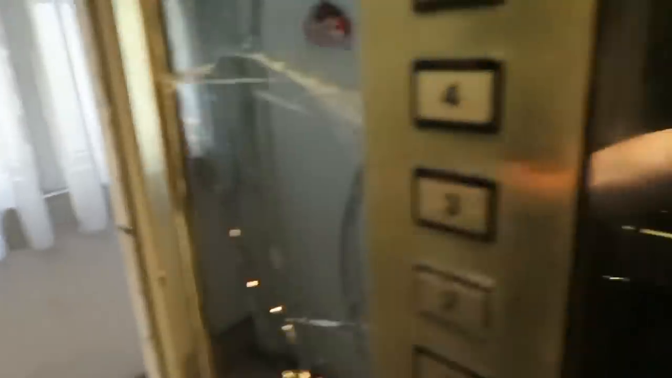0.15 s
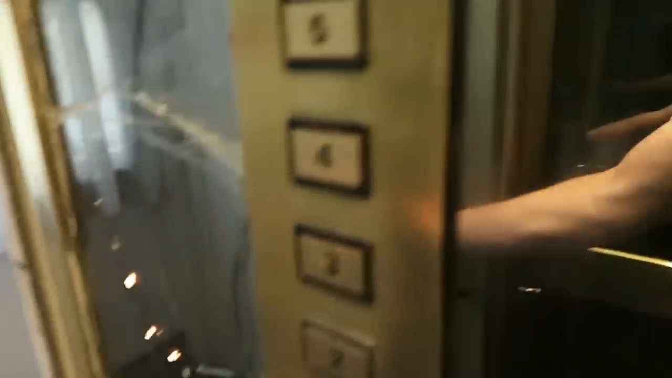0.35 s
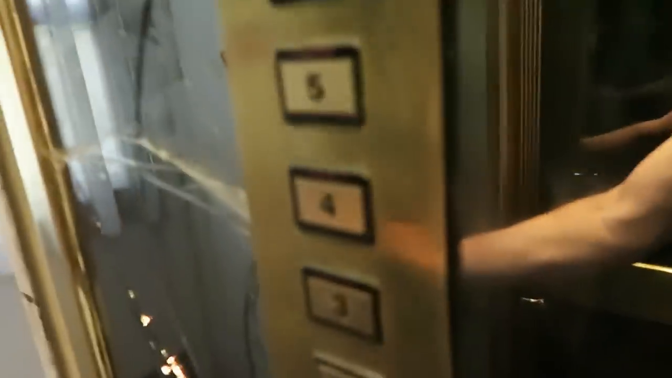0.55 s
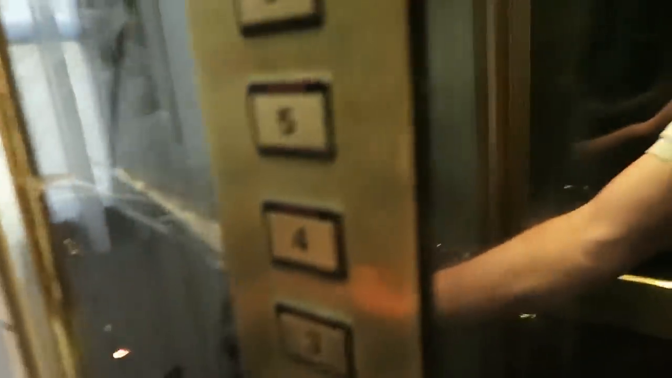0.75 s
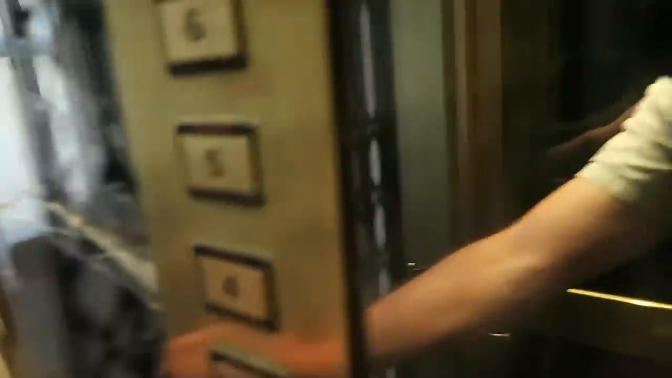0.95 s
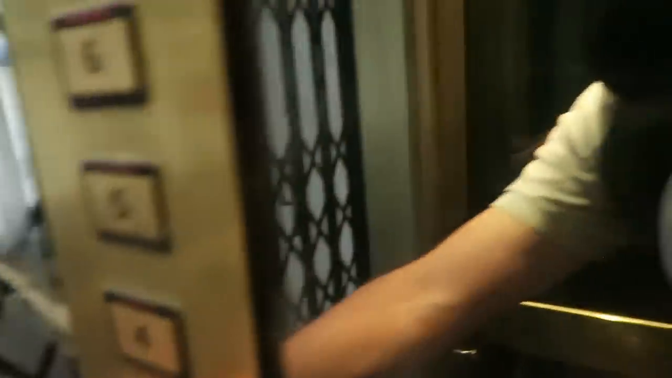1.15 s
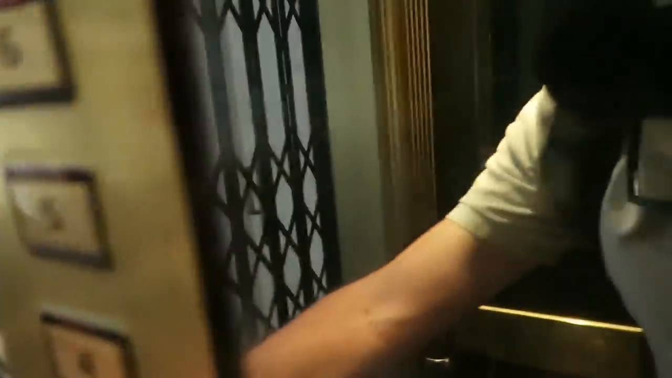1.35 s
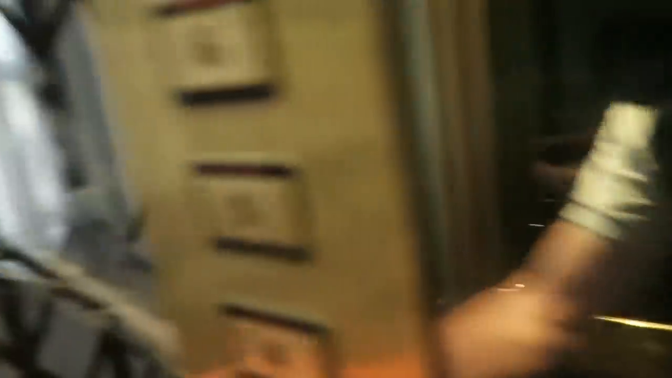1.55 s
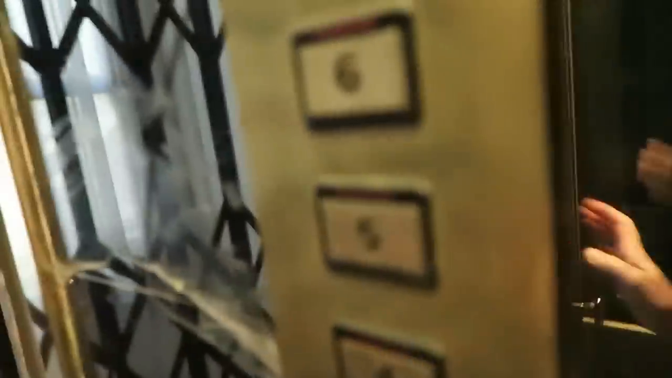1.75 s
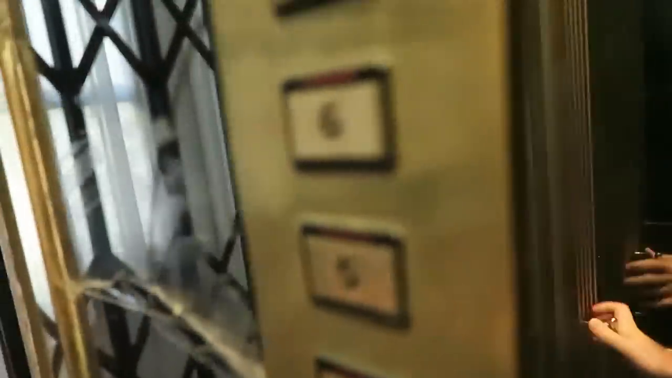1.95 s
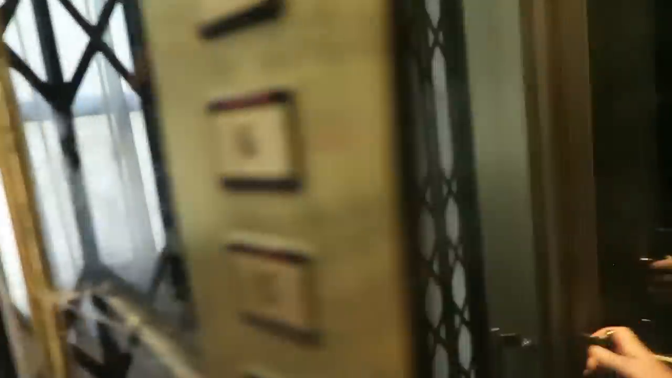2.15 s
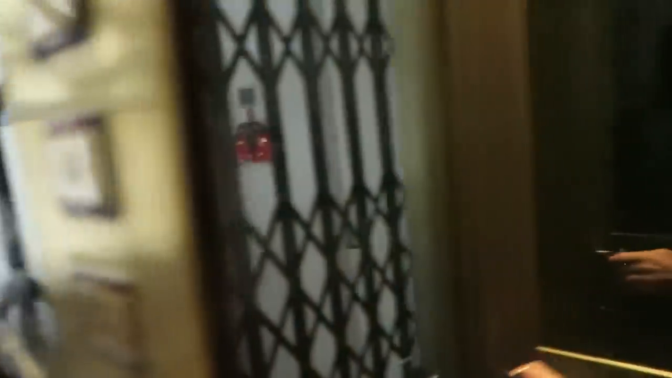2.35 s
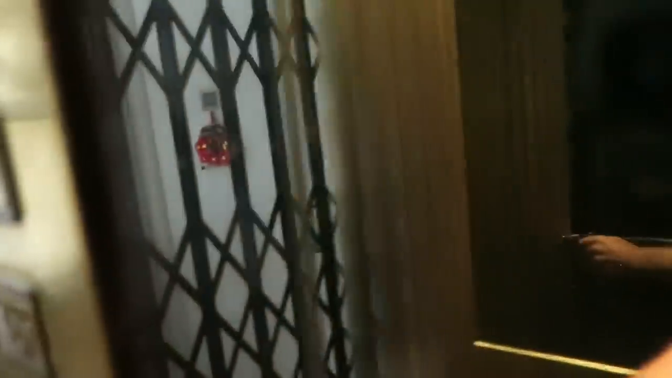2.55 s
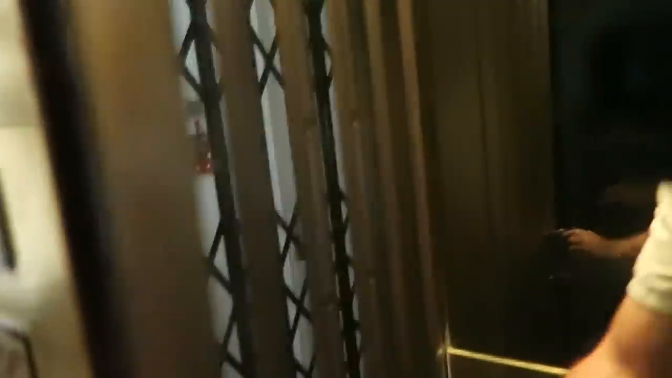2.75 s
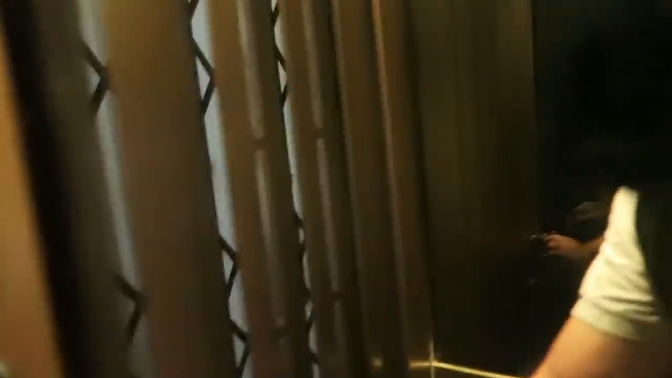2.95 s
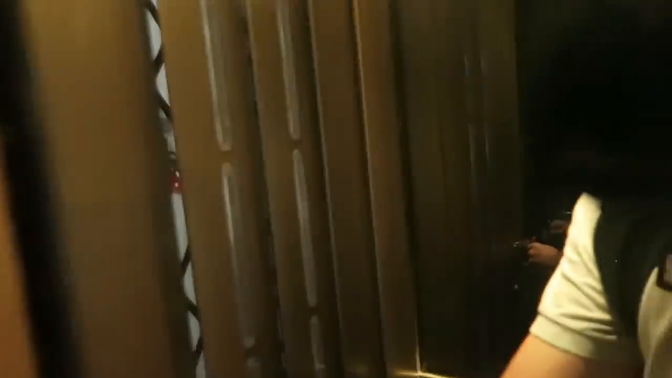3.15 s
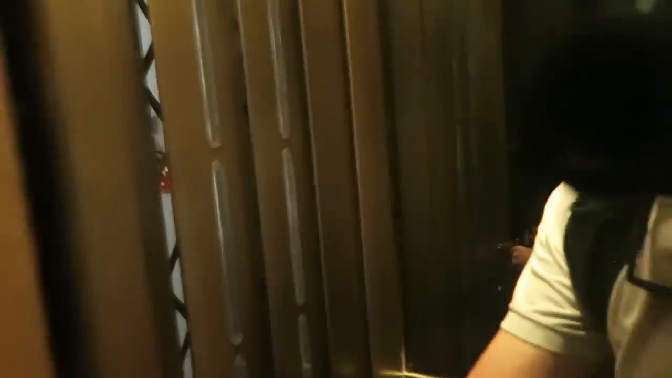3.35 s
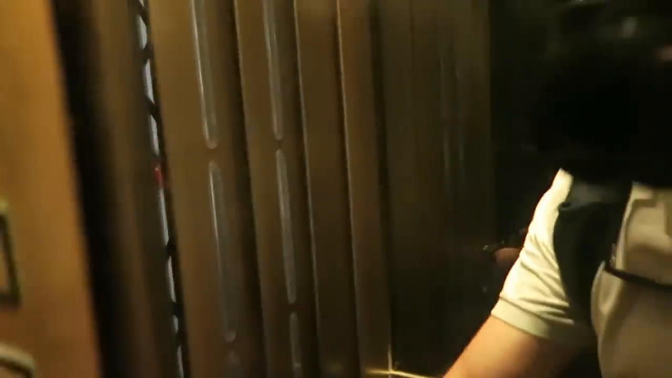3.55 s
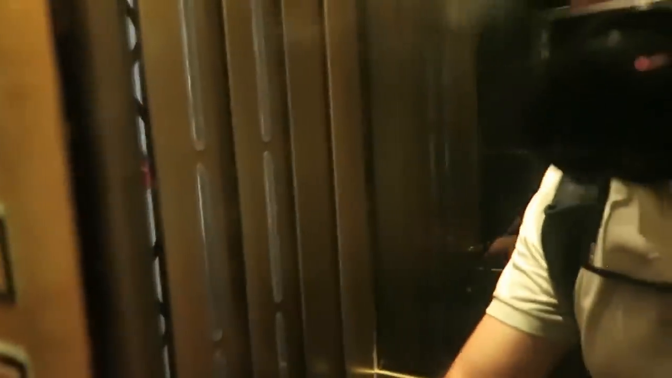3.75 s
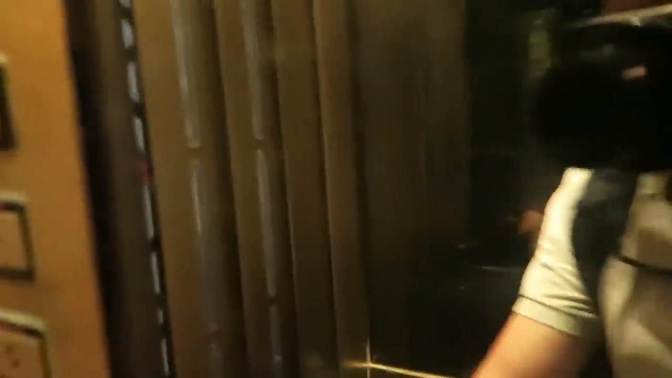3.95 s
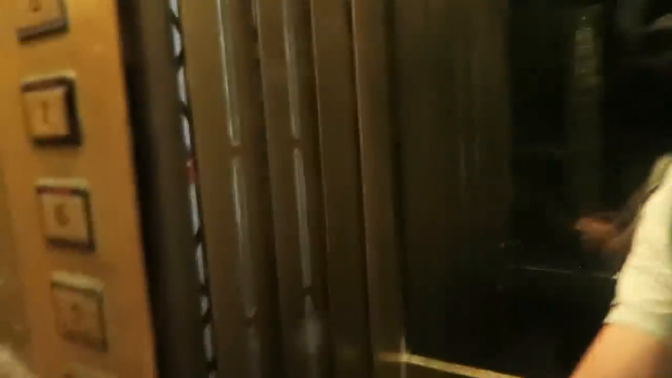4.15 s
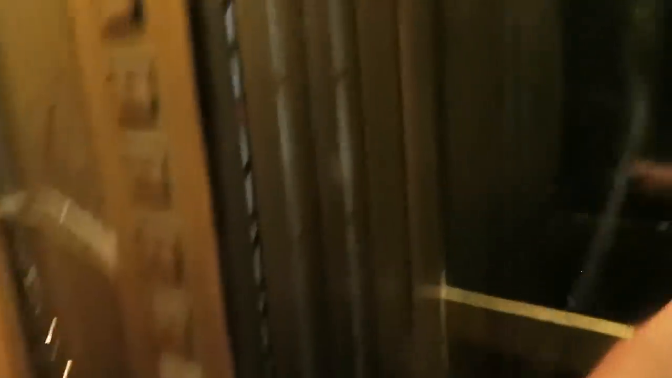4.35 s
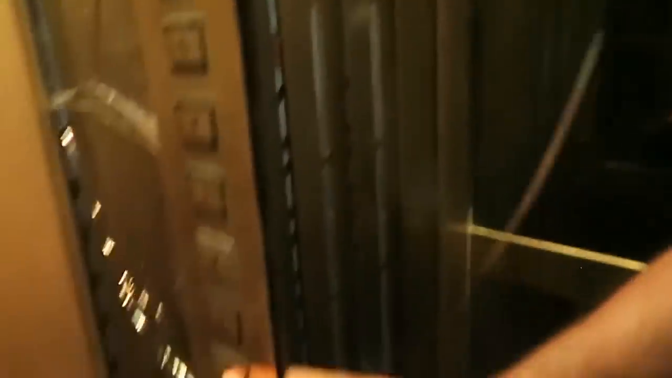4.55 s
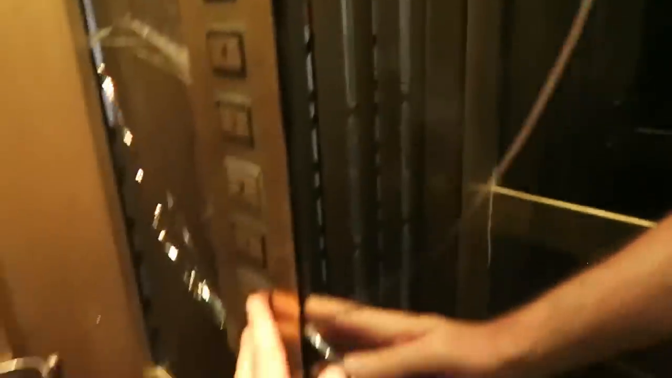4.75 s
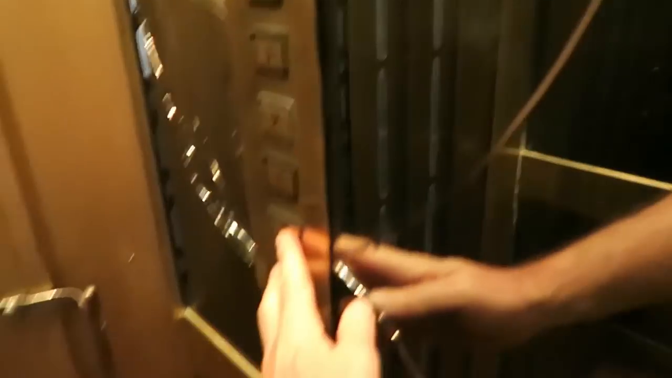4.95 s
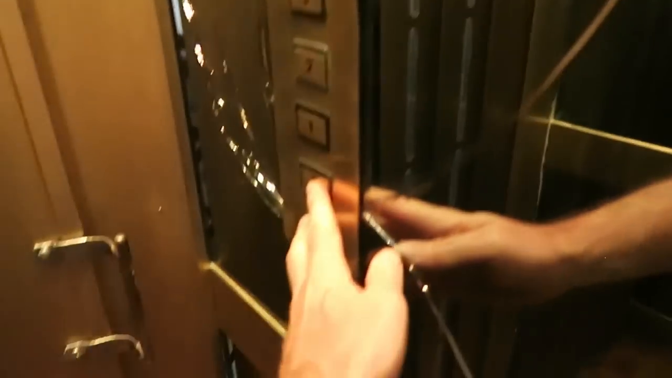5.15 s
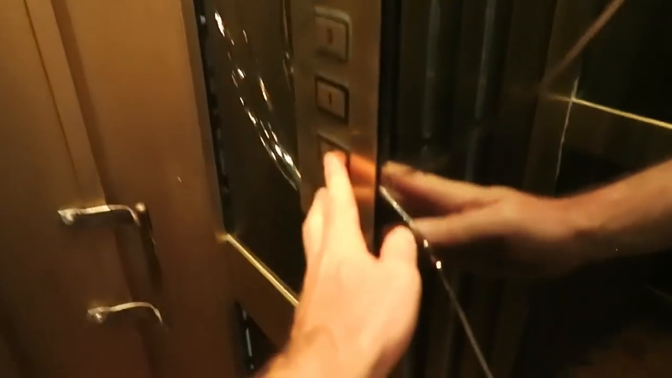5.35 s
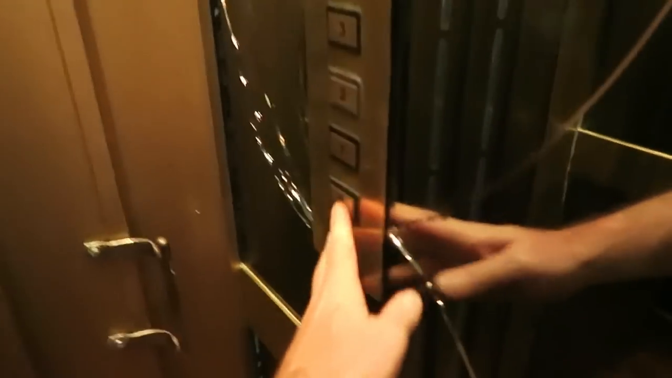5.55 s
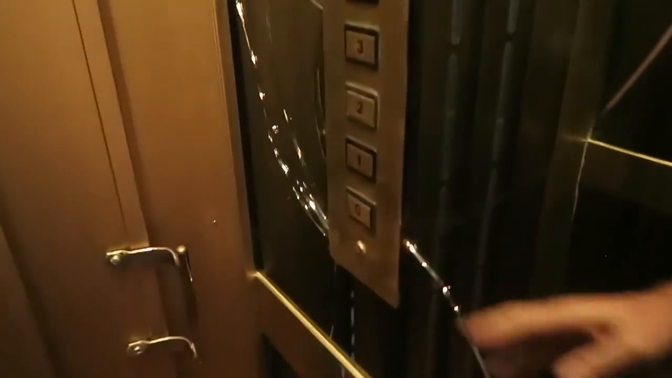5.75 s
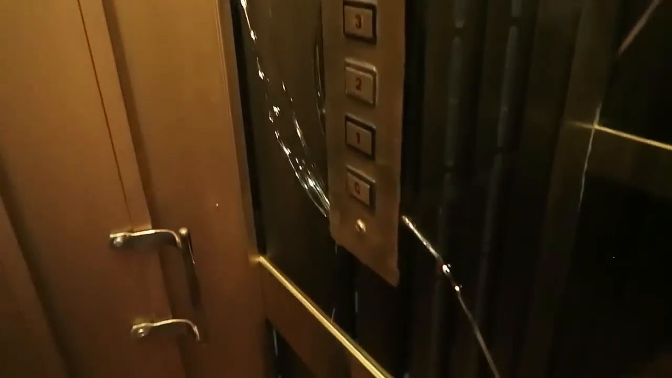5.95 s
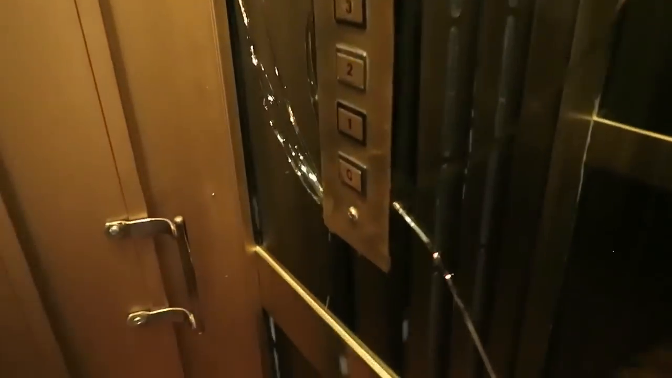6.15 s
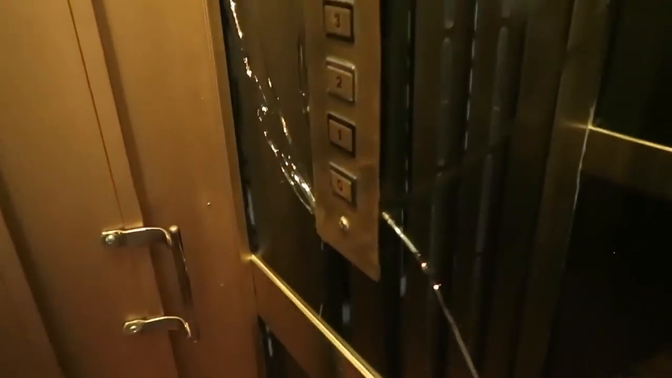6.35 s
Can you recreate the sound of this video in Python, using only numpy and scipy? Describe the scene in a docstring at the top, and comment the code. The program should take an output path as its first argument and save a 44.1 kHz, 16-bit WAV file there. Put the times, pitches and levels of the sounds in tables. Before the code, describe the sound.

An old small lift is closed and started, heard close by a handheld phone in a reverberant stairwell. A hard metallic knock comes at 0.1 s over low rumble, with a smaller click at 0.2. From 0.4 to 1.2 s a lattice gate scrapes along its rail, growing louder, links clinking and a roller squealing around 1.4 kHz; it slams and latches with a tight double clack at 1.18 and 1.27. Faint ticks follow in the decay. From 2.2 to 3.0 folding doors clatter densely, with clear ringing taps near 2.6 and 2.9 and a tiny high squeak at 2.7; final knocks land at 3.26 and 3.5. A low hum swells; sleeve rustles pass at 3.9 and 4.5-4.8. A faint button click at 5.03 and brief scrape lead to a sharp bang at 5.24 with rattling echoes. From 5.9 low rolling rumble and a soft clunk at 6.33 end it.

```python
"""Gate, doors and jolt of an old lift car

A steel lattice gate is drawn shut and latches, folding doors rattle closed, a sleeve brushes past,
a button is pressed and the small car jolts off with a bang. Impacts excite modal resonators, sliding
parts drive them with stick-slip noise, and small links add decaying sines. A hum made of filtered noise
lies beneath; a stairwell adds most of a second of decay. A hand-held phone hears it at two close ports.
"""
import sys
import numpy as np
from scipy import signal
from scipy.fft import rfft, irfft
from scipy.io import wavfile
from scipy.ndimage import uniform_filter1d

SR = 44100
rng = np.random.default_rng(int(sys.argv[2]) if len(sys.argv) > 2 else 0)


def output_pcm(signal):
    """Save a mono or channel-first signal as 16-bit PCM at the path in sys.argv[1].

    Samples are clipped to [-1, 1] before scaling.
    """
    pcm = np.clip(np.atleast_2d(signal).T, -1, 1) * 32767
    wavfile.write(sys.argv[1], SR, np.round(pcm).astype(np.int16))


N = 282240
TIME = np.arange(N) / SR


def undb(db):
    """Level to amplitude: 20 dB is a factor of ten."""
    return 10 ** (np.asarray(db) / 20)


def unit(x):
    """Normalise by the effective value: root mean square becomes one."""
    return x / np.sqrt(np.mean(x ** 2))


def shape(x, hz, db):
    """Zero-phase linear filtering: gains in dB joined on a log-frequency axis."""
    f = np.maximum(np.arange(len(x) // 2 + 1) * SR / len(x), 1)
    gain = undb(np.interp(np.log(f), np.log(hz), db))
    return irfft(rfft(x) * gain, len(x))


def band(x, lo_hz, hi_hz):
    """Band-pass filtering, then normalised to unit power."""
    sos = signal.butter(2, [lo_hz, hi_hz], "bandpass", fs=SR, output="sos")
    return unit(signal.sosfilt(sos, x))


def curve(rows, column=1):
    """Level envelope: a dB column joined over time, -120 dB outside its span."""
    rows = np.array(rows)
    return np.interp(TIME, rows[:, 0], rows[:, column], left=-120, right=-120)


def grit(size, grain_ms, spread_db):
    """Granular contact noise: many small contacts of uneven strength."""
    k = max(int(grain_ms * SR / 1000), 2)
    sizes = undb(spread_db * rng.exponential(size=size // k + 1))
    strength = uniform_filter1d(np.repeat(sizes, k)[:size], k)
    return unit(strength * rng.standard_normal(size))


def walk(rate, size=N):
    """Slow random modulation: levels held 1 / rate s and slewed, spread near one."""
    k = int(SR / rate)
    held = np.repeat(rng.standard_normal(size // k + 1), k)
    return 0.917 * uniform_filter1d(uniform_filter1d(held, k), k)[:size]


def ring(x, modes, lift_db, direct=1, detune=1):
    """Modal superposition: direct sound plus resonances, with a lift and detuning for all or each."""
    hz = np.maximum(np.arange(len(x) // 2 + 1) * SR / len(x), 1)
    lift_db, detune = np.broadcast_to(lift_db, len(modes)), np.broadcast_to(detune, len(modes))
    response = direct
    for (f, width, db), lift, d in zip(modes, lift_db, detune):
        width = max(width, 4)  # Hz
        response = response + undb(db + lift) / (1 + 1j * (hz ** 2 - (f * d) ** 2) / (hz * width))
    return irfft(rfft(x) * response, len(x))


def diffuse(x, size):
    """Diffuse field: magnitudes kept, phases unrelated, as if arriving by other paths."""
    frames = signal.stft(x, nperseg=size)[2]
    turns = np.exp(2j * np.pi * rng.random(frames.shape))
    return np.sqrt(2) * signal.istft(frames * turns, nperseg=size)[1][:N]


SHAFT_FROM_S = 5.1  # from here the metal sounds into the shaft

# Spectrum of the building's drone: [f/Hz, level/dB per Hz]
DRONE_TONE = [(53, -29), (90, -7), (130, -9), (186, -2), (236, -5.5), (300, -3), (458, -7), (799, -6.5),
              (1100, 7), (3730, -5), (6100, -18), (12100, -26), (13800, -46), (15000, -58)]
# Resonances of the hum: [f/Hz, width/Hz (at least 4 is used), level/dB before a common lift]
HUM_RING = [(53, 3.4, 5.1), (95, 3.7, 10.8), (191.2, 1.77, 4.9), (249.6, 3, 1.6), (295.8, 4.6, 4.7),
            (389, 6.5, 3.1), (499, 4.44, 2)]
# Deep rumble of the swaying car: [t/s, level/dB]
SHAKE = [(0.0, -35), (0.19, -33), (0.5, -40), (0.8, -40), (1.0, -39), (1.51, -46), (1.57, -82), (2.23, -60),
         (2.3, -52), (3.0, -51), (3.7, -54), (5.5, -56.5), (5.9, -44.5), (5.99, -41), (6.08, -34),
         (6.22, -43), (6.33, -34.5), (6.4, -43)]
DRONE_DB, HUM_SWELL_DB, HISS_FLICKER_DB, SWAY_DB = -50, 2.5, 1.8, 2.5
SHUT_DB, SHUT_S = 6, 2.77  # the hum grows over one second from here, closer once the doors are shut
BOOM_S, BOOM_DB, THUMP_DB = 0.051, -15, -40
SHAFT_BOOM_DB = -4.5  # the shut car booms less
BASS_DIP_S, BASS_DIP_DB = (0.93, 3.1), -6  # the deepest hum dips


def background(metal):
    """Forced vibration: rumble and drone, with panels booming along with the power that shakes them."""
    keep = np.exp(-1 / (BOOM_S * SR))
    shaking = np.sqrt(signal.lfilter([1 - keep], [1, -keep], metal ** 2))
    drone = ring(shape(rng.standard_normal(N), *np.transpose(DRONE_TONE)), HUM_RING, lift_db=2.0)
    hum = undb(DRONE_DB + SHUT_DB * np.clip(TIME - SHUT_S, 0, 1) + HUM_SWELL_DB * walk(3.796))
    boom = undb(BOOM_DB + SHAFT_BOOM_DB * (TIME > SHAFT_FROM_S)) * shaking
    low = unit(shape(drone, (700, 1500), (0, -30))) * (hum + boom)
    in_dip = (TIME > BASS_DIP_S[0]) & (TIME < BASS_DIP_S[1])
    low = np.where(in_dip, shape(low, (170, 240), (BASS_DIP_DB, 0)), low)
    high = unit(shape(drone, (700, 1500), (-30, 0))) * undb(-56.0 + HISS_FLICKER_DB * walk(3.7))
    rumble = ring(band(rng.standard_normal(N), 28, 110), [(56.3, 7.6, 5.3), (93.6, 3.4, 1.9)], lift_db=1.5)
    sway = undb(curve(SHAKE) + SWAY_DB * walk(10.0))
    return low + high + rumble * (sway + undb(THUMP_DB) * shaking)


# Decay of the stairwell, stretched by each caller: [f/Hz, t60/s]
STAIR_T60 = [(150, 1), (600, 1), (2000, 0.94), (4300, 0.74), (5300, 0.67), (7000, 0.57), (12000, 0.32)]


def stairwell(x, longer):
    """Statistical reverberation: dense echoes build over some ms and die exponentially band by band."""
    t = np.arange(int(1.5 * SR)) / SR
    noise = rfft(rng.standard_normal(len(t)))
    place = np.log(np.maximum(np.arange(len(noise)) * SR / len(t), 1))
    centres = np.log([hz for hz, _ in STAIR_T60])
    tail = np.zeros(len(t))
    # overlapping bands that add up to one, each with its own decay
    for share, (_, t60) in zip(np.eye(len(centres)), STAIR_T60):
        part = irfft(noise * np.interp(place, centres, share), len(t))
        tail += part * np.exp(-np.log(1000) * t / (t60 * longer))
    tail *= 1 - np.exp(-t / 0.0078)
    return signal.fftconvolve(x, tail / np.sqrt(np.sum(tail ** 2)))[:N]


# Colour of the shaft: [f/Hz, level/dB]
SHAFT_TONE = [(300, -0.5), (700, 0.5), (1200, -2), (2500, -4), (4000, -0.5), (7000, -2)]
# Panels that colour the shaft: [f/Hz, width/Hz, level/dB before a common lift]
SHAFT_RING = [(294, 20, 2), (1080, 60, 1), (1762, 50, 2), (2250, 70, 0), (2950, 70, 0), (3736, 70, 2),
              (4350, 70, 2)]
STAIR_DB, SHAFT_DB = -14.5, 1  # the shaft is wetter by SHAFT_DB
SHAFT_LONGER = 1.19  # share of the tabled t60
PING_ROOM_DB = -9  # the taps are close by and stir the stairwell less


def reverberation(metal, taps):
    """Coupled spaces: early metal and taps excite the stairwell, later metal the panelled shaft."""
    late = TIME > SHAFT_FROM_S
    stairs = (metal * ~late + undb(PING_ROOM_DB) * taps) * undb(STAIR_DB)
    shaft = ring(shape(metal * late, *np.transpose(SHAFT_TONE)), SHAFT_RING, lift_db=-2.5)
    return stairwell(stairs, longer=0.95) + stairwell(shaft * undb(STAIR_DB + SHAFT_DB), SHAFT_LONGER)


# Strokes of the sleeve: [t/s, swell/s, hold/s, fade/s, level/dB]
CLOTH = [(3.785, 0.16, 0.0069, 0.039, -41.5), (4.42, 0.081, .0, 0.034, -49.5),
         (4.548, 0.11, 0.11, 0.059, -40)]
# Spectrum of the fabric: [f/Hz, level/dB per Hz]
CLOTH_TONE = [(530, -27), (900, -3.5), (1170, -5.5), (2110, -1), (4920, -11), (8540, -13.5), (14000, -22)]
CLOTH_EDGE_DB = -13  # start of the swell and end of the fade
CLOTH_TRAIL_S, CLOTH_TRAIL_DB = 0.12, -16  # the hiss trails off after the stroke


def cloth():
    """Broadband friction noise: smooth hiss of fabric that swells, holds, fades and trails off."""
    hiss = unit(shape(grit(N, grain_ms=0.44, spread_db=1.0), *np.transpose(CLOTH_TONE)))
    steps_db = np.array([CLOTH_EDGE_DB, 0, 0, CLOTH_EDGE_DB, CLOTH_EDGE_DB + CLOTH_TRAIL_DB])
    strength = np.zeros(N)
    for s, swell, hold, fade, db in CLOTH:
        times = np.cumsum([s, swell, hold, fade, CLOTH_TRAIL_S])
        strength += undb(curve(list(zip(times, db + steps_db))))
    return strength * hiss


DRIFT = .012  # share of pitch by which modes wander in a slide
CATCH_DB = 5


def wander(x):
    """Frequency modulation by variable reading speed: a resonance slides as the part moves."""
    place = np.arange(len(x))
    return np.interp(place + np.cumsum(DRIFT * walk(14, size=len(x))), place, x)


def slide(rows, modes, roll_db, hiss_db, patchy_db, ring_db, clacks_per_s, scrape_db=0.0):
    """Stick-slip friction: rollers and links drag in uneven slips; each mode speaks as its part catches."""
    scrape = band(grit(N, grain_ms=4.0, spread_db=1.0), 590, 2145)
    roll = band(rng.standard_normal(N), 177, 590)
    hiss = band(grit(N, grain_ms=0.72, spread_db=2.5), 1400, 7900)
    clacks = (rng.random(N) < clacks_per_s / SR) * undb(1.26 * rng.exponential(size=N))
    jolt = 1 + 0.5 * signal.lfilter([1], [1, -np.exp(-1 / (0.0029 * SR))], clacks)
    mix = jolt * (undb(scrape_db) * scrape + undb(hiss_db) * hiss) + undb(roll_db) * roll
    mix *= undb(curve(rows) + patchy_db * walk(39.8))
    start = int(rows[0][0] * SR)
    span = slice(start, start + 3 * SR // 2)
    drag = mix[span]
    rings = np.zeros(N)
    for mode in modes:
        catching = drag * undb(CATCH_DB * walk(22.32, size=len(drag)))
        rings[span] += wander(ring(catching, [mode], ring_db, direct=0))
    return mix + rings


def squeak(hz, db, waver, stutter_db, per_s):
    """Friction-driven oscillation: a thin tone that wavers and stutters as the part slips."""
    level = undb(db + stutter_db * walk(per_s))
    phase = 2 * np.pi * np.cumsum(hz * (1 + waver * walk(300))) / SR
    return np.sqrt(2) * level * np.sin(phase)


CLINK_LO_HZ, CLINK_HI_HZ, CLINK_TILT_DB = 881, 7380, -3.5  # tilt per octave
CLINK_T60_S = 0.066  # each clink takes a chance share from 0.38 to 2.28 of it
CLINKS_PER_S, CLINK_SPREAD_DB = 340, 24


def clinks(rows, db):
    """Random impact process: loose links and pins tick, each with its own short decaying note."""
    span = rows[-1][0] - rows[0][0]
    chances = rng.random((int(CLINKS_PER_S * span), 4))
    when, pitch, size, length = chances.T[:, :, None]
    start = ((rows[0][0] + when * span) * SR).astype(int)
    octaves = pitch * np.log2(CLINK_HI_HZ / CLINK_LO_HZ)
    k = np.arange(SR // 10)
    gain = undb(curve(rows)[start] + db - CLINK_SPREAD_DB * size + CLINK_TILT_DB * octaves)
    tone = np.sin(2 * np.pi * CLINK_LO_HZ * 2 ** octaves * k / SR)
    decay = np.exp(-np.log(1000) * k / SR / (CLINK_T60_S * (0.38 + 1.9 * length)))
    return np.bincount((start + k).ravel(), (gain * tone * decay).ravel(), N + SR)[:N]


# Force of the gate's drag along the rail: [t/s, level/dB]
GATE_SLIDE = [(0.0, -41.5), (0.084, -48), (0.178, -40.5), (0.322, -41.5), (0.422, -43.5), (0.466, -37),
              (0.644, -34), (0.896, -30), (1.17, -30.5)]
# Low hum notes: [f/Hz, level/dB]
HUM_NOTES = [(55, -4), (97, -14), (146, 1), (194, 0), (291, -4), (388, -4)]
HUM_NOTES_DB, HUM_REST_DB, HUM_STOPS_S, HUM_WAVER = -12.5, -52, 1.53, .004


def hum_notes():
    """Low hum notes: wavering tones swell while the gate is dragged and stop once it has settled."""
    notes = np.zeros(N)
    for hz, db in HUM_NOTES:
        level = undb(db + 1.2 * walk(4.0))
        notes += level * np.sin(2 * np.pi * np.cumsum(hz * (1 + HUM_WAVER * walk(8.5))) / SR)
    drag = uniform_filter1d(undb(curve(GATE_SLIDE)), int(.21 * SR))
    return np.sqrt(2) * notes * (drag * undb(HUM_NOTES_DB) + undb(HUM_REST_DB)) * (TIME < HUM_STOPS_S)


# Modes of the lattice gate: [f/Hz, width/Hz, level/dB before lift]
GATE_RING = [(144.6, 4.9, 13), (410, 7.3, -4), (687, 18, -0.5), (882, 13.7, 1), (1390, 21, -3.5),
             (1520, 11, -7), (2320, 26, 0.5), (2780, 49, -2.5), (3230, 37, -0.5), (4290, 56, 1),
             (5790, 57, 2.5), (6970, 1200, 0)]
# The roller sings on two notes by turns: [t/s, lower note level/dB, upper note level/dB]
ROLLER = [(0.44, -38.5, -46), (0.552, -38, -44), (0.564, -34, -44.5), (0.72, -33, -37.5),
          (0.74, -37.5, -44), (0.764, -37.5, -29), (0.798, -42, -40), (0.82, -41.5, -38),
          (0.888, -34.5, -33.5), (0.956, -32.5, -43), (1.032, -40.5, -39.5), (1.046, -34.5, -36.5),
          (1.094, -45, -49), (1.15, -38.5, -40.5)]
ROLLER_HZ = (1413, 1520)
ROLLER_WAVER, ROLLER_DRIFT, ROLLER_STUTTER_DB = .035, .018, 4.5


def gate():
    """Friction-excited modes: the lattice drags and clinks along its rail while a roller sings."""
    sound = slide(GATE_SLIDE, GATE_RING, roll_db=-4.0, hiss_db=-15, patchy_db=1.5, ring_db=9.0,
                  clacks_per_s=13)
    for k, hz in enumerate(ROLLER_HZ):
        pitch = hz * (1 + ROLLER_DRIFT * walk(13))
        sound += squeak(pitch, curve(ROLLER, column=k + 1), waver=ROLLER_WAVER,
                        stutter_db=ROLLER_STUTTER_DB, per_s=49)
    return sound + clinks(GATE_SLIDE, db=6.5)


# Taps on a door bar: [t/s, level/dB, ring length as a share of the mode's t60]
PINGS = [(2.385, -24, 0.8), (2.572, -11.5, 1), (2.593, -6.5, 0.9), (2.611, -13, 0.8), (2.8817, -0.5, 0.57),
         (2.914, -4, 0.9), (2.928, -5, 1), (2.967, -4.5, 0.46), (2.987, -15, 0.73), (3.011, -16, 0.6),
         (3.031, -23, 0.5)]
# Close modes of the bar, varied at each tap: [f/Hz, level/dB, t60/s]
BAR_MODES = [(1640, -6, 0.012), (1824, 3.5, 0.028), (1930, -5.5, 0.096), (2145, -6, 0.023)]


def pings():
    """Beating of neighbouring modes: clean taps set the close modes of one bar ringing together."""
    out, t = np.zeros(N), np.arange(SR // 4) / SR
    chances = rng.standard_normal((len(PINGS), len(BAR_MODES)))
    for (s, db, length), chance in zip(PINGS, chances):
        tone = np.zeros(len(t))
        for (hz, g, t60), c in zip(BAR_MODES, chance):
            decay = np.exp(-np.log(1000) * t / (t60 * length))
            tone += undb(g + 1.9 * c) * np.sin(2 * np.pi * hz * (1 + 0.0062 * c) * t) * decay
        i = int(s * SR)
        out[i:i + len(t)] += undb(db) * (1 - np.exp(-t / 0.001)) * tone
    return out


# Force of the folding doors' slide: [t/s, level/dB]
DOOR_SLIDE = [(2.17, -51), (2.246, -41.5), (2.32, -36.5), (2.478, -24.5), (2.538, -26), (2.636, -19.5),
              (2.7, -25.5), (2.86, -27.5), (3.002, -36.5), (3.15, -40)]
# Modes of the doors: [f/Hz, width/Hz, level/dB before lift]
DOOR_RING = [(228.3, 13.5, 6), (438.5, 68, -2.5), (1038, 13, -9), (1910, 144, -11.5), (2410, 69, -10.5),
             (3380, 15, -11.5), (4070, 24, -1), (4950, 43, -2)]
# A dry hinge: [t/s, f/Hz, level/dB]
SQUEAK = [(2.69, 10200, -75), (2.718, 10260, -34.5), (2.738, 10140, -47), (2.744, 10320, -39),
          (2.82, 10100, -56)]


def doors():
    """Friction-excited modes: folding doors drag and clink while a dry hinge squeaks."""
    sound = slide(DOOR_SLIDE, DOOR_RING, roll_db=-18.5, hiss_db=-29, patchy_db=2.0, ring_db=5.0,
                  clacks_per_s=49)
    hinge_hz = np.interp(TIME, *np.transpose(SQUEAK)[:2])
    sound += squeak(hinge_hz, curve(SQUEAK, column=2), waver=0.0054, stutter_db=4.5, per_s=140)
    return sound + clinks(DOOR_SLIDE, db=3.5)


# A scrape that grows into the bang: [t/s, level/dB]
PRESS_RUB = [(5.08, -66), (5.12, -64), (5.178, -51), (5.192, -39), (5.212, -31), (5.222, -27), (5.24, -27)]
# Resonances of the scrape: [f/Hz, width/Hz, level/dB before lift]
RUB_RING = [(710, 120, 0), (1680, 58, 8), (2190, 60, -8)]
# A faint thin ring: [t/s, level/dB]
WHINE = [(4.8, -80), (4.86, -72), (5.0, -72), (5.04, -85)]
# A creak as the button gives: [t/s, level/dB]
CREAK = [(5.09, -70), (5.125, -53), (5.17, -55), (5.2, -62)]
# The car starts along its guides: [t/s, level/dB]
CAR_ROLL = [(5.9, -59), (5.966, -40.5), (6.068, -42.5), (6.15, -43), (6.21, -37.5), (6.29, -36.5),
            (6.33, -38.5), (6.4, -44)]
# Modes of the car: [f/Hz, width/Hz, level/dB before lift]
CAR_RING = [(250, 39, 10.5), (1036, 80, 8.5), (1890, 36, 5), (2460, 340, 0), (3260, 260, 0), (3740, 300, 5),
            (4300, 67, 5.5), (5130, 86, -10), (7500, 60, 8)]
WHINE_HZ, CREAK_HZ = 5000, 1670


def car():
    """Rolling and sliding friction: a scrape, a faint ring, a creak, then rolling along the guides."""
    sound = slide(PRESS_RUB, RUB_RING, roll_db=-7, hiss_db=-21, patchy_db=2, ring_db=-1.0,
                  clacks_per_s=17)
    sound += squeak(WHINE_HZ, curve(WHINE), waver=0.004, stutter_db=7.0, per_s=54)
    sound += squeak(CREAK_HZ, curve(CREAK), waver=0.034, stutter_db=5.0, per_s=160)
    # only the lowest mode of the car answers the rolling
    return sound + slide(CAR_ROLL, CAR_RING[:1], roll_db=-2.0, hiss_db=-48, patchy_db=-2.5, ring_db=0.5,
                         clacks_per_s=15, scrape_db=-16)


# Modes of the handle: [f/Hz, width/Hz, level/dB before lift]
HANDLE_RING = [(2595, 25, 10), (3770, 12, 12), (4150, 28, 6), (4340, 19, 13), (4850, 21, 4.4),
               (5800, 18, 5), (1330, 32, 5.9)]
# Modes of the button: [f/Hz, width/Hz, level/dB before lift]
BUTTON_RING = [(2020, 63, 6.5), (3220, 46, 15), (3740, 60, 5), (4330, 60, 5)]
# Contact by kind: [modes, rise/ms, snap level/dB, ringing lift/dB, first crack level/dB over the
# rattle, share of the brightness already felt at EDGE_HZ]
TOUCH = {"gate": (GATE_RING, 0.97, -2, -1.4, -2.5, 0.45), "shove": (GATE_RING, 7.6, -10.5, -3.1, -12, 0.25),
         "latch": (GATE_RING, 0.49, 0.55, -10, 6.1, 0.69), "door": (DOOR_RING, 2.75, -1, 1, -1, 0.41),
         "handle": (HANDLE_RING, 2.1, -18, 7.6, 0.5, 0.23), "car": (CAR_RING, 1, 2, -8, -6.5, 0.34),
         "bang": (CAR_RING, 0.55, -16, -8, 0.5, 0.07), "nudge": (DOOR_RING, 6.2, -30, -1.8, -17, 0.42),
         "button": (BUTTON_RING, 0.85, 0, 0, -2, 0.19), "clunk": (CAR_RING, 1, -11, -13, -2, 0.17)}
# Blows: [t/s, kind, level/dB, thud/dB, body/dB, brightness/dB (these three against PEAK_HZ),
# rattle t60/s (at most 0.45 is used)]
KNOCKS = [(0.097, "shove", -21.5, 5, 6.5, -10.5, 0.33), (0.107, "shove", -6, -29, 2.5, -15, 0.34),
          (0.2179, "latch", -16.5, -42, -2, -11, 0.31), (0.28, "gate", -30, -15, 0, -3, 0.25),
          (0.3093, "gate", -23, -26, -6, -12, 0.43), (0.432, "nudge", -22.5, 3, -10, -13.5, 0.25),
          (0.459, "gate", -18.5, -27, -19, -8.5, 0.12), (0.488, "gate", -22, -12, -4, -9, 0.24),
          (0.537, "gate", -19.5, 0, -1, -11.5, 0.13), (0.6744, "gate", -24, -10, -1, -23, 0.2),
          (0.6994, "gate", -22.5, 4, 6.5, -22, 0.34), (0.8711, "gate", -17, -16, 5, -7, 0.11),
          (1.0435, "gate", -25.5, 6, 4, -9.5, 0.2), (1.1755, "latch", -14.5, -21, -13, -9, 0.1),
          (1.178, "latch", -1, -20, -15, -19.5, 0.06), (1.1885, "gate", -15, -33, -2, -12, 0.2),
          (1.198, "gate", -16, -19, 1, -12, 0.2), (1.2215, "gate", -15, -20, -1.5, -13.5, 0.3),
          (1.238, "gate", -24, -10, 8, -5, 0.2), (1.255, "nudge", -17.5, -5, 2, -5, 0.3),
          (1.267, "latch", -4.5, -13.5, -4, -9, 0.17), (1.61, "gate", -30, -14, -2, -9, 0.23),
          (1.707, "gate", -33, -22, 2, -16, 0.44), (1.7893, "gate", -46, -19, 12, -7, 0.33),
          (1.875, "gate", -33, -23, -21, -16.5, 0.14), (1.9505, "nudge", -38.5, -38, 6, -10.5, 0.3),
          (1.99, "nudge", -36, -20, 4, -11.5, 0.3), (2.156, "handle", -33.5, -12, -3, -9.5, 0.35),
          (2.2044, "handle", -38, -19, -6, -30, 0.47), (2.252, "nudge", -20, -32, -15, -15, 0.16),
          (2.303, "door", -10, -21.5, -16, -13.5, 0.45), (2.372, "nudge", -18, -28, -15, -18, 0.3),
          (2.382, "door", -7.5, -39, -9.5, -13.5, 0.51), (2.5529, "door", -17, -14.5, -6, -12, 0.37),
          (2.6199, "door", -9, -24, -14, -16.5, 0.2), (2.6393, "door", -15, -8, 9, -20, 0.29),
          (2.7207, "door", -19.5, 6, 2, -29, 0.15), (2.7625, "door", -12.5, -14, -2, -32, 0.16),
          (2.8216, "door", -21, 7, 6, -44, 0.18), (2.88, "door", -9.5, -1, -0.5, -16, 0.27),
          (2.8995, "door", -17.5, 4, 4, -49, 0.29), (2.915, "latch", -15.5, -2, -1, -22, 0.13),
          (2.928, "latch", -16.5, -15, -4, -19.5, 0.13), (2.967, "door", -14.5, -5.5, -2, -19.5, 0.3),
          (3.0103, "door", -23, -13.5, 4, -34, 0.12), (3.0916, "door", -34, -4, -1, -25, 0.17),
          (3.158, "nudge", -18, -27, -1, -17.5, 0.48), (3.2603, "door", -9, 1.5, 0, -10.5, 0.25),
          (3.2789, "door", -11, -23, 6.5, -24, 0.31), (3.5041, "door", -18.5, -12, -11, -24.5, 0.2),
          (3.608, "nudge", -29.5, -7, 8.5, -47, 0.29), (4.1317, "car", -44, 11, -3, -9, 0.14),
          (4.5208, "handle", -44, 6, 14, -6, 0.17), (5.0265, "button", -45, 0, -22, -7, 0.35),
          (5.182, "car", -55, -10.5, -12, 8.5, 0.43), (5.196, "car", -41, -16, -13, -7, 0.3),
          (5.215, "car", -22.5, 1, -3, -22, 0.17), (5.241, "bang", -5.5, -9, -8, -9.5, 0.15),
          (5.2554, "car", -11, 3, 0, -12, 0.32), (5.27, "car", -18.5, 7, 4.5, -9, 0.72),
          (5.3132, "car", -11.5, 0, -11, -9.5, 0.19), (5.7929, "car", -30, -1, -14, -19, 0.21),
          (5.9624, "car", -30, -4, -14, -19.5, 0.19), (6.3277, "clunk", -30, -11, 6, -34, 0.33),
          (6.361, "nudge", -36, -6, 1, -34, 0.39)]
THUD_HZ, BODY_HZ, PEAK_HZ, EDGE_HZ, BRIGHT_HZ, AIR_HZ = 250, 800, 1700, 3100, 5000, 9500
RATTLE_DB, SUB_DB, AIR_DB, AIR_SHARE, DROOP_DB = -8, -20, -4, 1.605, -10
CRACK_S, RING_SCATTER_DB = 0.0015, 2
DETUNE = .02  # share of pitch by which modes differ from blow to blow
LOOSE_LO_HZ, LOOSE_OCTAVES, LOOSE_WIDTH_HZ, LOOSE_DB = 2435, 2.1, 46, 7


def knocks(snap_s=0.0014):
    """Impact excitation: a snap and a dying rattle drive the modes of whatever is struck."""
    out, t = np.zeros(N + SR), np.arange(SR // 2) / SR
    contact = np.where(np.arange(len(t)) == 40, 1., 0.)
    for s, kind, db, thud, body, bright, t60 in KNOCKS:
        modes, rise_ms, snap_db, ring_db, crack_db, edge = TOUCH[kind]
        air = AIR_DB + AIR_SHARE * bright
        colour = ((60, THUD_HZ, BODY_HZ, PEAK_HZ, EDGE_HZ, BRIGHT_HZ, AIR_HZ, 15000),
                  (thud + SUB_DB, thud, body, 0, edge * bright, bright, air, air + DROOP_DB))
        rattle = shape(grit(len(t), grain_ms=3.0, spread_db=0.48), *colour)
        # level is set by the band around the peak
        rattle /= np.std(shape(rattle, (1000, 1250, 2350, 2800), (-60, 0, 0, -60)))
        snap = shape(contact, *colour) * np.exp(-t / snap_s)
        rise = 1 - np.exp(-t * 1000 / max(rise_ms, .1))
        crack = undb(crack_db) * np.exp(-t / CRACK_S)
        fall = np.exp(-np.log(1000) * t / np.clip(t60, .01, .45)) + crack
        blow = undb(db + RATTLE_DB) * rattle * rise * fall + undb(db + snap_db) * snap / snap.max()
        lifts = ring_db + RING_SCATTER_DB * rng.standard_normal(len(modes))
        # the handle keeps its pitches
        detune = 1 + DETUNE * (kind != "handle") * rng.standard_normal(len(modes))
        i = int(s * SR)
        out[i:i + len(t)] += ring(blow, modes, lifts, detune=detune)
        # three loose parts of chance pitch chink at every blow
        loose = [(LOOSE_LO_HZ * 2 ** (LOOSE_OCTAVES * c), LOOSE_WIDTH_HZ, LOOSE_DB)
                 for c in rng.random(size=3)]
        out[i:i + len(t)] += ring(blow * np.exp(-t / 0.0097), loose, lift_db=0.0, direct=0)
    return out[:N]


# Treble gain of the diffuse side signal: [f/Hz, level/dB re mid]
PORTS = [(500, -88.5), (900, -74.5), (1300, -34.5), (2400, -46.5), (3300, -22.5), (4400, -8), (8000, -3.5),
         (14900, 10)]
# Side gain in the bass, before its spectral weighting: [t/s, level/dB re mid]
BASS_WIDTH = [(0, -19), (1.5, -22), (1.56, -91), (6.4, -39.5)]
# The building's hum comes from all round: [f/Hz, side level/dB re mid]
ROOM_WIDTH = [(250, -56), (450, -34), (1300, -22.5), (3000, -12.5), (4500, -31)]


def scene():
    """Superposition and partial coherence: all sources add, and two ports differ by side signals."""
    taps = pings()
    metal = gate() + doors() + car() + knocks()
    building = background(metal)
    mid = metal + taps + reverberation(metal, taps) + cloth() + building + hum_notes()
    # the side signal is weak in the middle range and grows in the treble; a direct lag adds a quarter-turn
    # share
    quarter_turn = np.imag(signal.hilbert(mid))
    treble = shape(diffuse(mid, size=128) + 0.16 * quarter_turn, *np.transpose(PORTS))
    bass = shape(diffuse(mid, size=2048), (40, 100, 800, 1100), (-26.0, -1, 5.0, -10.5))
    bass *= undb(curve(BASS_WIDTH))
    side = treble + bass + shape(diffuse(building, size=1024), *np.transpose(ROOM_WIDTH))
    return np.array([mid + side, mid - side])


# Treble droop of the microphone: [f/Hz, level/dB]
MIC_TONE = [(10000, -1.5), (12400, -0.5), (13000, -6.5), (15000, -18)]
TOP_HZ = 15499


def record(dry):
    """Transducer limits: the microphone droops at the top, peaks past full scale clip, the top is cut."""
    heard = np.clip([shape(x, *np.transpose(MIC_TONE)) for x in dry], -1, 1)
    return signal.sosfilt(signal.ellip(10, .2, 80, TOP_HZ, fs=SR, output="sos"), heard)


dry = scene()
out = record(dry)
output_pcm(out)
```